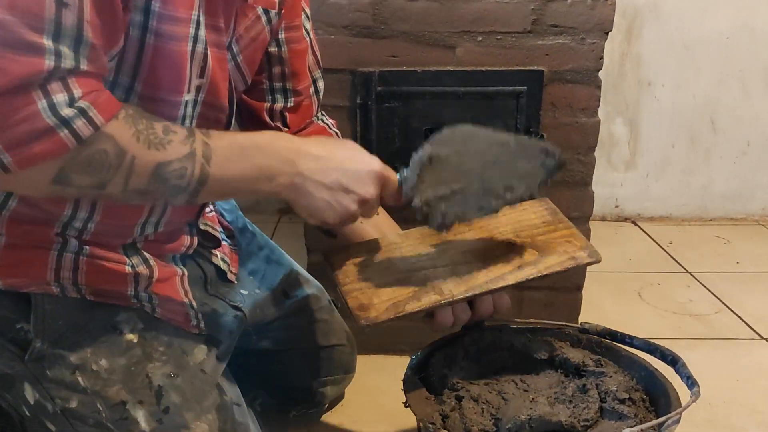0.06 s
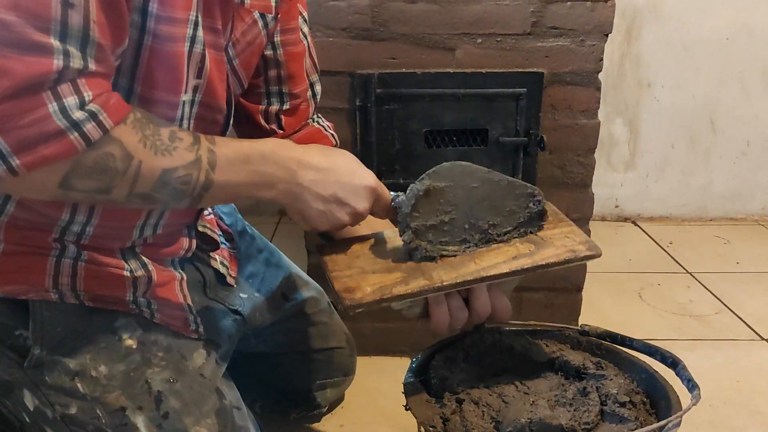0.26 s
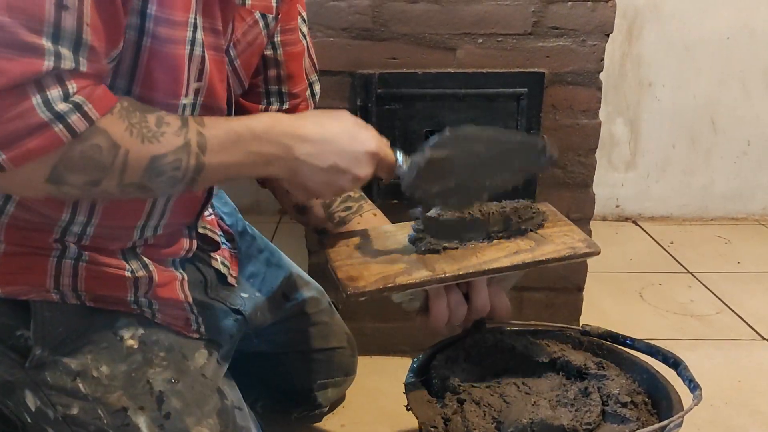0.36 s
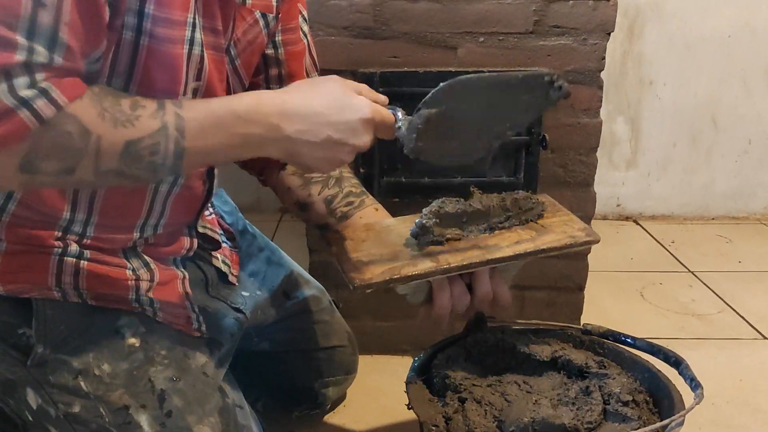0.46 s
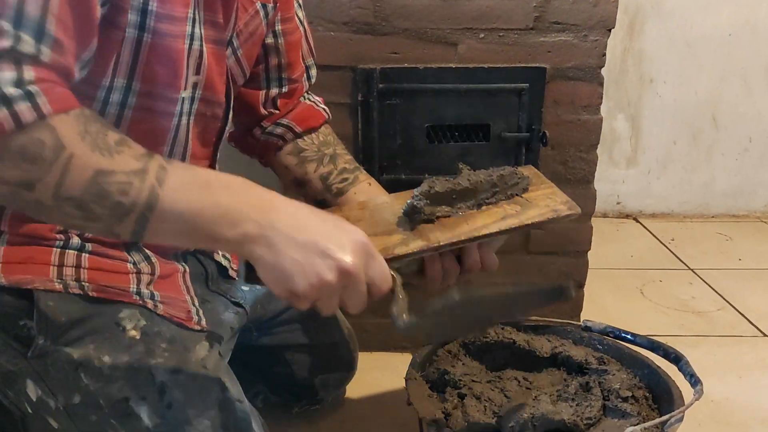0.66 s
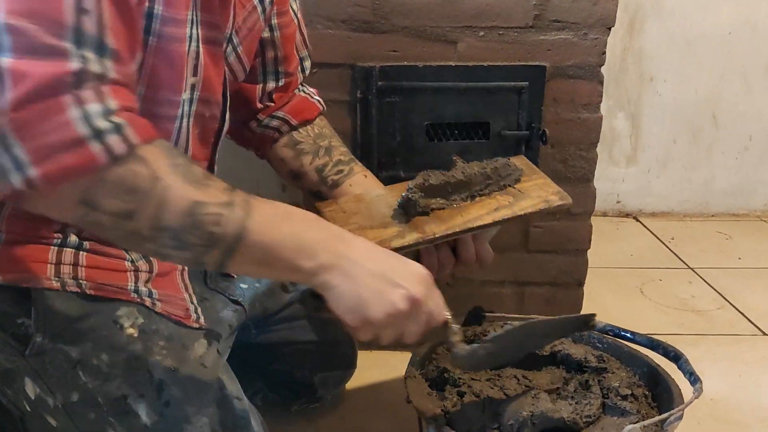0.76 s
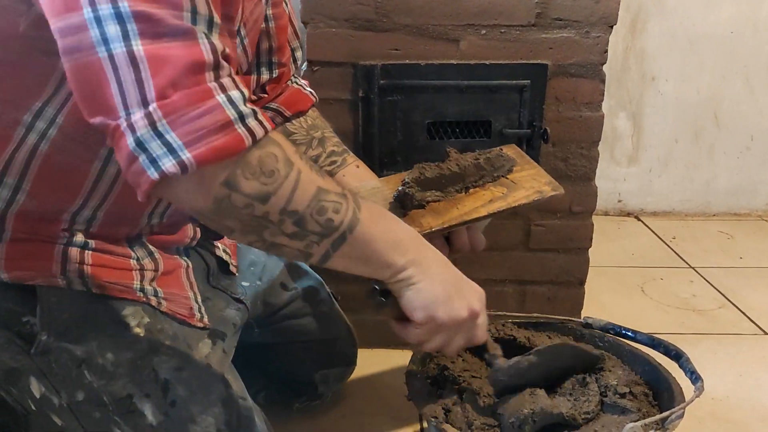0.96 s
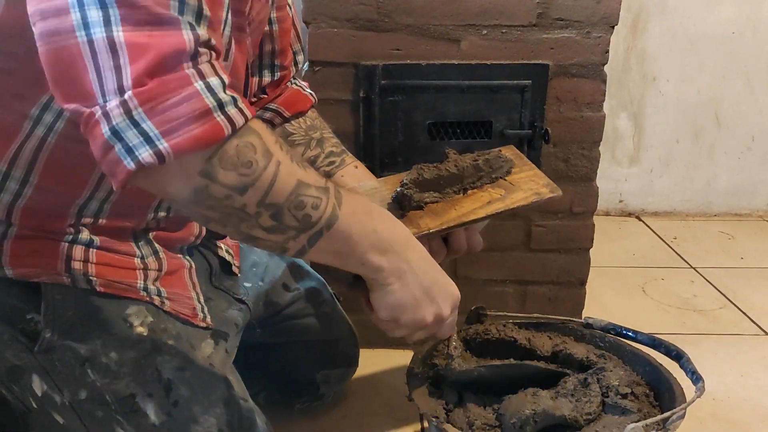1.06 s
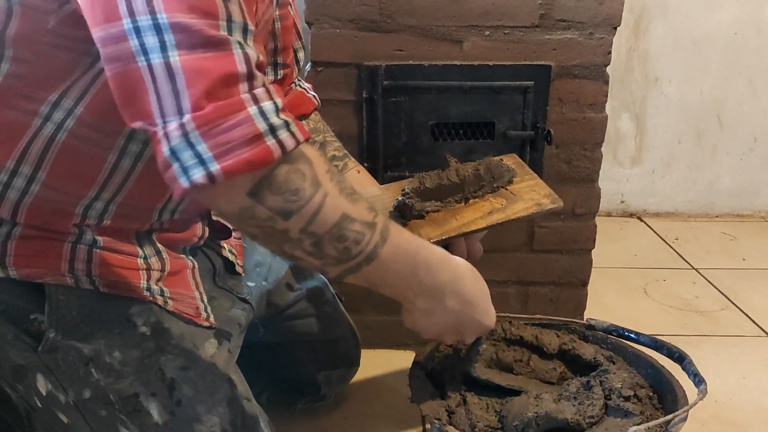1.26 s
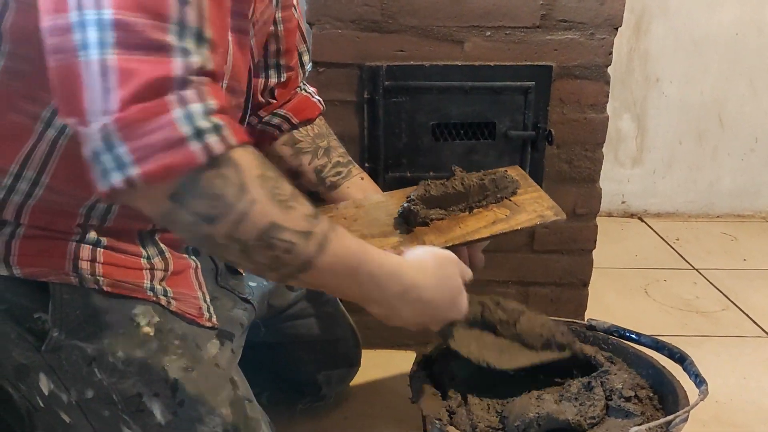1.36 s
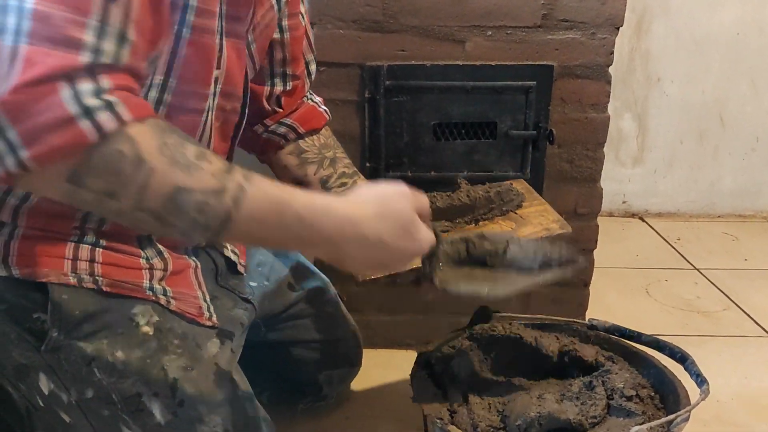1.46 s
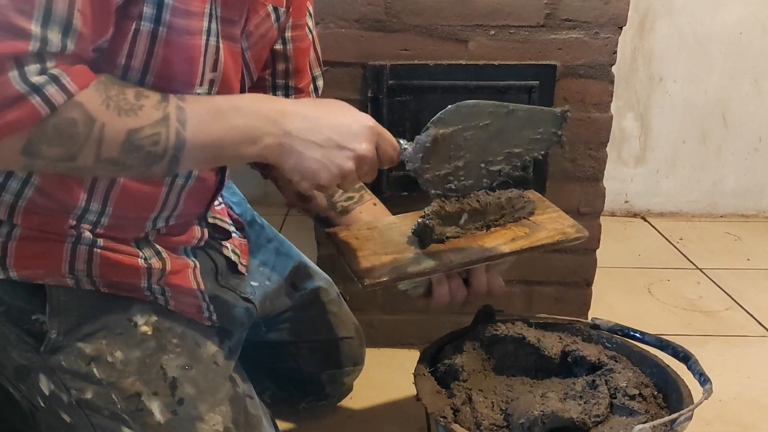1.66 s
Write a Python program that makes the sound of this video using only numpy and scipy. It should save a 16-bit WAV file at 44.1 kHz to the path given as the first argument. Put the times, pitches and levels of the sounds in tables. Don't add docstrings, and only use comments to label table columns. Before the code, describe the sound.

A steel trowel knocks twice on a wooden board, then digs grittily into wet plaster

```python
import sys
import numpy as np
from scipy import signal
from scipy.fft import rfft, irfft
from scipy.io import wavfile

SR = 44100
rng = np.random.default_rng(int(sys.argv[2]) if len(sys.argv) > 2 else 0)


def elevation(decibels):
    levels = np.asarray(decibels, float)
    return 10 ** (levels / 20)


def generate_wav(signal):
    frames = np.transpose(np.atleast_2d(signal))
    scaled = np.clip(frames, -1, 1) * 32767
    pcm = np.round(scaled).astype(np.int16)
    wavfile.write(sys.argv[1], SR, pcm)


N = 74970


def at_hz(points, hz):
    points = np.array(points)
    return np.interp(np.log(hz), np.log(points[:, 0]), points[:, 1])


def rms_one(x):
    return x / np.sqrt(np.mean(x ** 2) + 1e-20)


def swell(start, rise, hold):
    release_s = 0.04
    t = np.arange(N) / SR - start
    return np.clip(t / rise, 0, 1) * np.exp(-np.maximum(t - rise - hold, 0) / release_s)


def swells(events):
    return sum(elevation(db) * swell(start, rise, hold) for start, rise, hold, db in events)


def ring(clicks, hz, t60):
    radius = elevation(-60 / (t60 * SR))
    w = 2 * np.pi * hz / SR
    return signal.lfilter([0, np.sin(w)], [1, -2 * radius * np.cos(w), radius * radius], clicks + 1e-18)


def thin(x, hz):
    return signal.sosfilt(signal.butter(3, hz, "high", fs=SR, output="sos"), x)


def band_pass(x, low, high):
    return signal.sosfilt(signal.butter(2, [low, high], "band", fs=SR, output="sos"), x)


def bands(size, likeness):
    edges = 20 * 2 ** np.arange(0, 9.8, .5)
    white = rng.standard_normal((2, 2, size))
    for k, (low, high) in enumerate(zip(edges, edges[1:])):
        centre = np.sqrt(low * high)
        mid, side = band_pass(white[k % 2], low, high)
        alike = np.clip(at_hz(likeness, centre), -1, 1)
        yield centre, np.sqrt(1 + alike) * mid + np.sqrt(1 - alike) * side * [[1], [-1]]


def grains(spectrum):
    grains_per_s, spread_db, cycles = 7000, 2.8, 6.0
    sizes = elevation(spread_db * np.minimum(rng.exponential(1, N), 5)) * rng.choice([-1, 1], N)
    clicks = sizes * (rng.random(N) < grains_per_s / SR)
    dealt = rng.integers(0, 20, N)
    out = 0
    for k, hz in enumerate(np.geomspace(spectrum[0][0], spectrum[-1][0], 20)):
        out = out + elevation(at_hz(spectrum, hz)) * hz * ring(clicks * (dealt == k), hz, cycles / hz)
    return rms_one(out)


def hum():
    # (frequency [Hz], level per Hz [dB])
    air_colour = [(12, -29), (20, -3.5), (92, -13), (377, -24.5), (571, -23.5), (733, -29), (1020, -28.5),
                  (13100, -45.5), (15000, -48)]
    # (frequency [Hz], likeness [-1..1])
    air_alike = [(60, 0.12), (240, 0.11), (950, 0.073), (3770, 0.21), (15000, 0.02)]
    air = rms_one(sum(band * elevation(at_hz(air_colour, hz)) for hz, band in bands(N, air_alike)))
    drone = np.sin(2 * np.pi * 60.5 * np.arange(N) / SR)
    fade = swell(1.3, -0.8, 0.3)
    return elevation(-57) * air + elevation(-60.5) * fade * drone


def sleeve():
    # (frequency [Hz], level per Hz [dB])
    cloth = [(710, -70.5), (1200, -15.5), (2590, 6), (3060, -2.5), (4430, 18.5), (13000, -18)]
    # (start [s], rise [s], hold [s], level [dB])
    rustles = [
        (0, 0.026, 0.15, -72.5),
        (0.677, .02, .09, -66.5),
    ]
    return grains(cloth) * swells(rustles)


def slush():
    # (frequency [Hz], level per Hz [dB])
    wet_colour = [(500, -22.5), (900, 5), (1300, -14), (2000, -9), (3000, 1.5), (4500, -1.5)]
    # (start [s], rise [s], hold [s], level [dB])
    sucks = [
        (1.024, 0.066, 0.082, -62),
        (1.227, 0.055, 0.033, -58.5),
        (1.362, 0.018, 0.014, -58),
    ]
    return swells(sucks) * thin(grains(wet_colour), 696)


def squelches():
    # (time [s], length [s], frequency [Hz])
    pockets = [
        (1.265, .03, 1280),
        (1.345, .02, 530),
        (1.38, .04, 940),
        (1.41, .05, 815),
        (1.395, .05, 1950),
    ]
    pocket_db = [-49, -52, -52, -55, -49]
    t = np.arange(N) / SR
    rough = rng.standard_normal(N)
    out = 0
    for (start, length, hz), db in zip(pockets, pocket_db):
        puff = rough * np.sin(np.pi * np.clip((t - start) / length, 0, 1))
        out = out + elevation(db) * np.sqrt(hz / SR) * ring(thin(puff, hz * .8), hz, 30 / hz)
    return out


def grit():
    # (frequency [Hz], level per Hz [dB])
    grit_colour = [(1180, -32), (2000, -5.5), (7710, 2.5), (9760, -38), (14000, -27.5), (14500, -18),
                   (15000, -54)]
    # (start [s], rise [s], hold [s], level [dB])
    strokes = [
        (0.994, 0.011, 0.032, -58),
        (1.032, 0.061, 0.062, -54),
        (1.199, 0.035, 0.045, -54),
        (1.329, 0.054, 0.039, -51),
        (1.647, 0.0076, .1, -66.5),
    ]
    return swells(strokes) * thin(grains(grit_colour), 1390)


def snaps():
    # (time [s], peak level [dB], frequency [Hz])
    stones = [(1.0395, -35, 3480), (1.053, -34, 8140), (1.0625, -58, 7900), (1.073, -38, 7800),
              (1.0741, -24, 5600), (1.0759, -24, 7880), (1.224, -24.5, 5180), (1.2227, -36, 3200),
              (1.224, -41.5, 1290), (1.347, -39.5, 7060), (1.355, -28.5, 6000), (1.3869, -21.5, 7800),
              (1.3866, -20.5, 6120), (1.471, -38, 5600)]
    out = 0
    for time, db, hz in stones:
        click = np.arange(N) == int(time * SR)
        out = out + elevation(db) * thin(ring(click, hz, 16 / hz), hz * .7)
    return out


def splats():
    # (time [s], level [dB], decay [s])
    bursts = [
        (.2312, -11.5, 0.0032),
        (0.374, -28.5, 0.0034),
    ]
    t = np.arange(N) / SR
    burst = sum(elevation(db) * (t > s) * np.exp(-np.maximum(t - s, 0) / decay) for s, db, decay in bursts)
    return band_pass(burst * rng.standard_normal(N), 1060, 6800)


def struck(modes, column, cycles):
    # (time [s], steel level [dB], wood level [dB])
    touches = np.array([(0.2271, -42, -45), (0.2288, -14, -41), (.2303, -6.5, -34), (.2317, -1.5, -25),
                        (0.233, -3, -25.5), (0.2348, -7, -35), (.2352, -11, -30.5), (.3747, -10.5, -26),
                        (.3755, -13, -34), (0.3764, -3, -28.5), (.3790, -14, -31)])
    times = touches[:, 0]
    chance = rng.standard_normal((len(touches), len(modes)))
    out = 0
    for k, (hz, first_db, second_db) in enumerate(modes):
        mode_db = np.where(times < .3, first_db, second_db)
        strength = elevation(touches[:, column] + mode_db - 6 + 2.4 * chance[:, k])
        clicks = np.zeros(N)
        clicks[(times * SR).astype(int)] = strength * (-1) ** k
        out = out + ring(clicks, hz, (cycles if hz < 7000 else 9) / hz)
    return out


def board():
    # (frequency [Hz], first knock level [dB], second knock level [dB])
    wood_modes = [(161, -7, -10), (245, 2.5, 0), (332, 4, 5.5), (455, -5.5, 0.5), (576, -11, -10.5),
                  (690, 4.5, -17), (857, 1, -18), (1026, -13, -20), (1050, 1.5, 1.5), (1233, 7, -3),
                  (1430, 8.5, 4)]
    return struck(wood_modes, column=2, cycles=12)


def blade():
    # (frequency [Hz], first knock level [dB], second knock level [dB])
    steel_modes = [(1686, -15, -12.5), (2090, -11, -11.5), (2516, -2, -3.5), (2646, 0, 0),
                   (3200, -4.5, -4.5), (3440, -7.5, -4), (3810, -0.5, -2), (4400, 3.5, -4), (5430, 3.5, -1),
                   (6040, 4, -5), (7020, -1, -7.5), (7800, 1.5, -26.5), (9330, -0.5, -17),
                   (10460, -15.5, -40)]
    return struck(steel_modes, column=1, cycles=15)


def room(x):
    # (frequency [Hz], T60 [s])
    decay_times = [(100, 0.2), (260, 0.52), (700, 0.34), (1840, 0.3), (4850, 0.21), (12800, 0.16)]
    # (frequency [Hz], level [dB])
    echo_colour = [(100, 4.5), (300, 7.5), (1000, 6.5), (3000, 8), (7000, 6.5), (14000, -2.5)]
    # (frequency [Hz], likeness [-1..1])
    echo_alike = [(60, 0.78), (180, 1), (550, 0.504), (1650, -0.14), (4970, -0.12), (15000, 1)]
    far_db, far_stretch, far_low_hz = -21.5, 3.31, 700
    first_echo_s, build_s = 0.001, 0.0016
    t = np.arange(SR) / SR
    tail = 0
    for hz, band in bands(SR, echo_alike):
        fall_db = -60 * t / at_hz(decay_times, hz)
        far = (hz > far_low_hz) * elevation(far_db + fall_db / far_stretch)
        tail = tail + band * elevation(at_hz(echo_colour, hz)) * (elevation(fall_db) + far)
    tail = tail * (1 - np.exp(-np.maximum(t - first_echo_s, 0) / build_s))
    tail = elevation(-1) * tail / np.sqrt(np.sum(tail ** 2) / 2)
    echoes = signal.fftconvolve(x[None], tail, axes=1)[:, :N]
    return echoes + elevation(-51) * ring(x, 224.3, 0.71)


def direct(x):
    return np.array([x, np.interp(np.arange(N) - 2, np.arange(N), x)])


def shade(pair):
    # (frequency [Hz], left minus right level [dB])
    left_lean = [(100, -1), (250, -3), (600, -1), (1500, .5), (5000, 1), (7500, 9), (10000, 6), (14000, 2)]
    half_db = at_hz(left_lean, np.arange(1, N // 2 + 2) * SR / N) / 2
    return irfft(rfft(pair) * elevation([half_db, -half_db]), N)


def scene():
    knocks = blade() + board() + splats()
    near = thin(knocks, 103) + grit() + slush() + sleeve()
    beamed = squelches() + snaps()
    echoes = room(near + elevation(-9.5) * beamed)
    return shade(direct(near + beamed) + echoes) + hum()


def roll_off(x):
    return signal.sosfilt(signal.butter(12, 15620, fs=SR, output="sos"), x)


def record(dry):
    top_cut = signal.cheby2(16, 42, 14700, fs=SR, output="sos")
    return roll_off(signal.sosfilt(top_cut, dry))


dry = scene()
out = record(dry)
generate_wav(out)
```